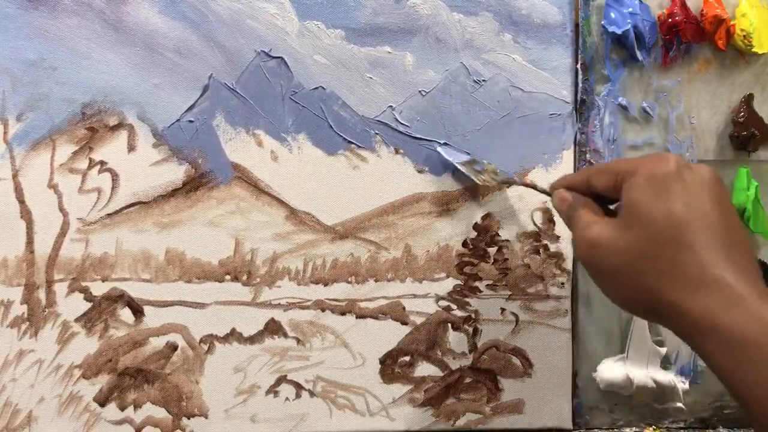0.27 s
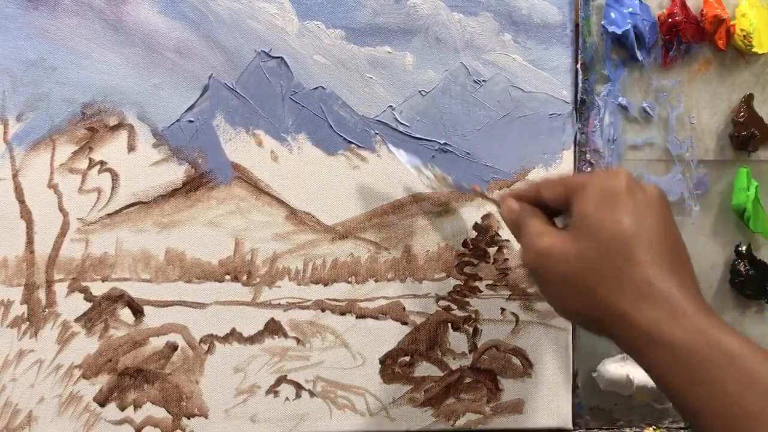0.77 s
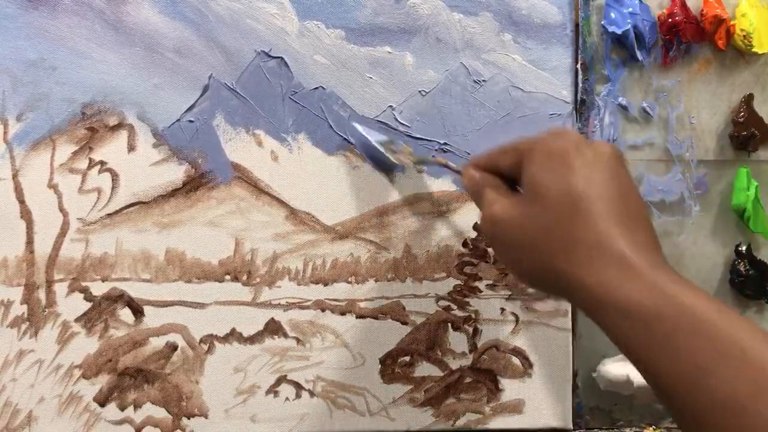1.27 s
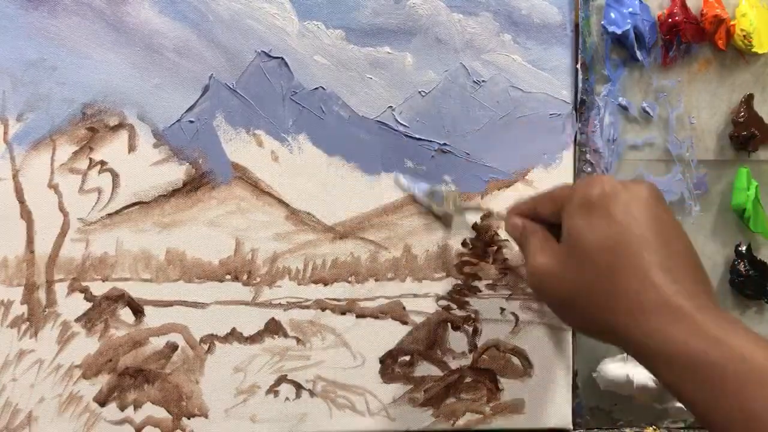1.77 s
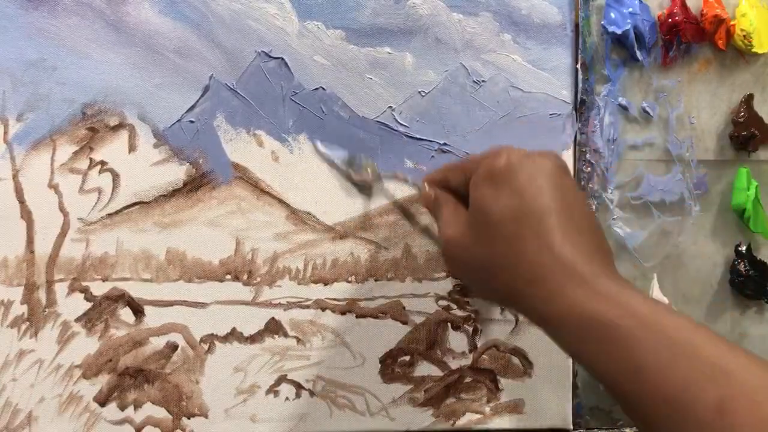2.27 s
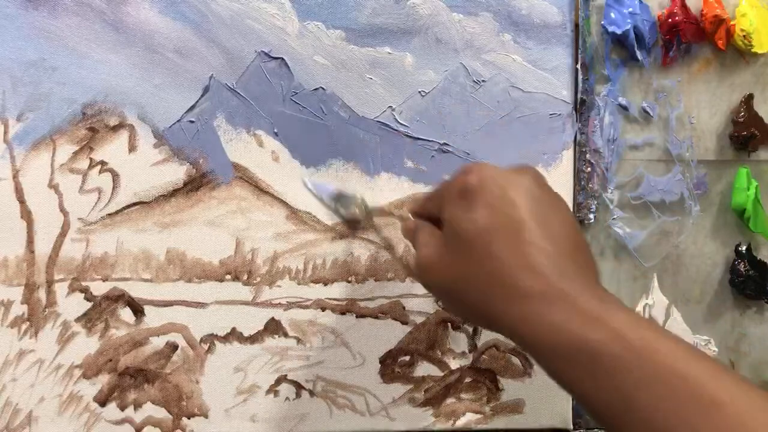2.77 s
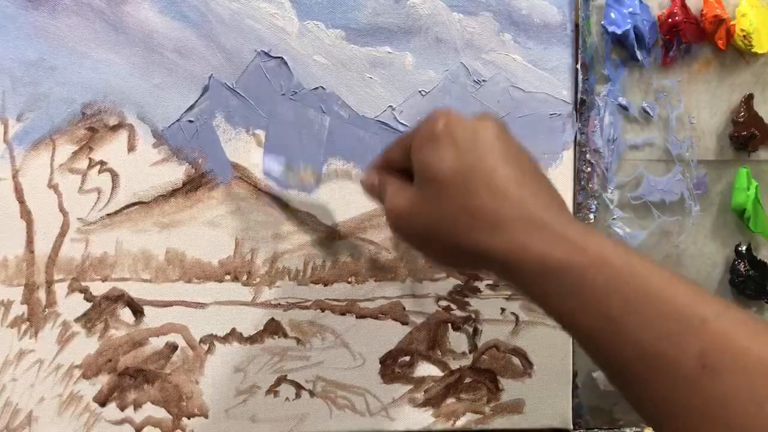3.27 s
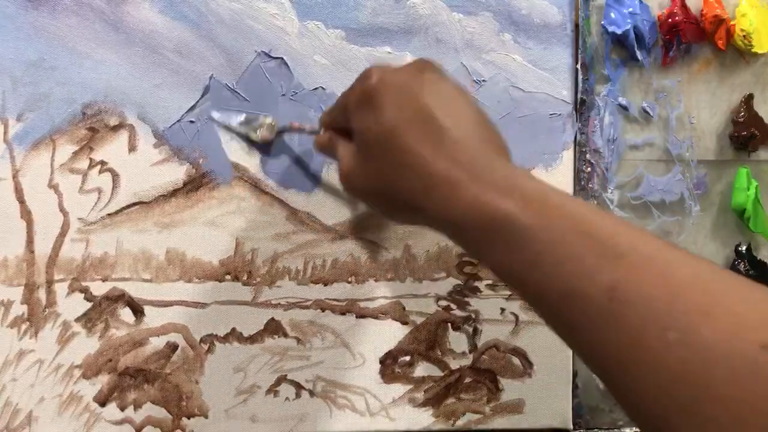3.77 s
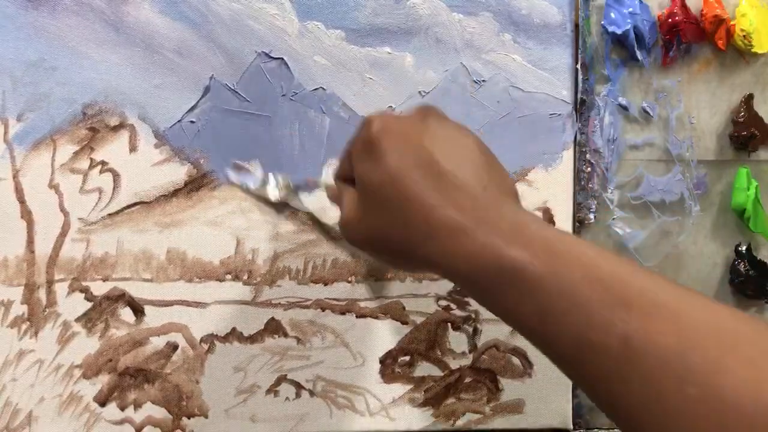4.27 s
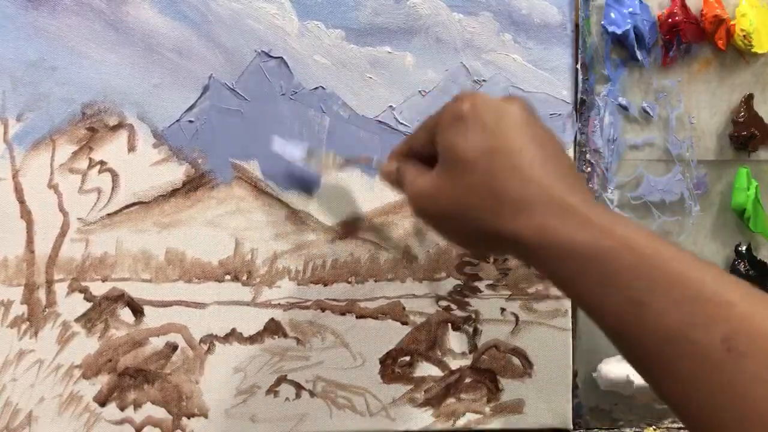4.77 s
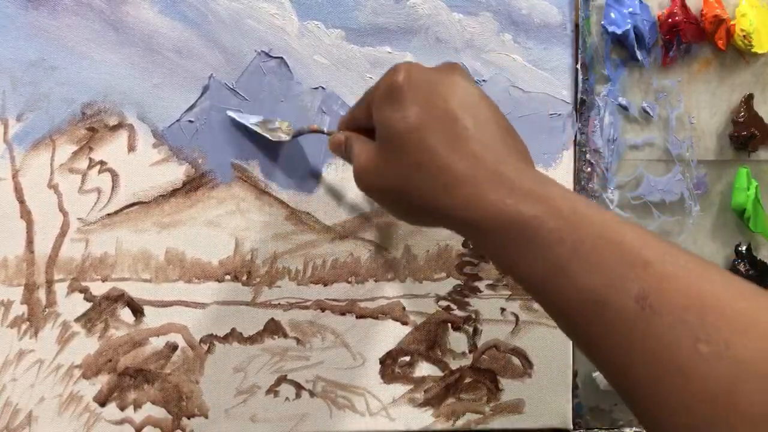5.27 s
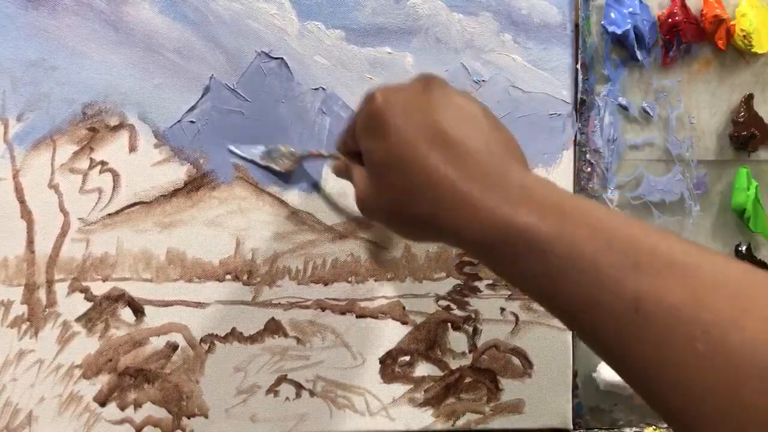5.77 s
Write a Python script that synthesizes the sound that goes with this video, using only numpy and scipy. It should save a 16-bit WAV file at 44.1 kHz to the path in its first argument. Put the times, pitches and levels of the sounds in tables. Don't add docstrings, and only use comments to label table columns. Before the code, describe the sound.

Close, quick palette-knife scrapes rasp across taut canvas, with hollow papery resonance, faint steel hiss, landing taps and low easel thuds in a quiet room.

```python
import sys
import numpy as np
from scipy import signal
from scipy.fft import rfft, irfft
from scipy.io import wavfile
from scipy.ndimage import uniform_filter1d

SR = 44100
rng = np.random.default_rng(int(sys.argv[2]) if len(sys.argv) > 2 else 0)


def to_wav(s):
    ch = np.atleast_2d(s).T
    pcm = np.round(np.clip(ch, -1, 1) * 32767)
    wavfile.write(sys.argv[1], SR, pcm.astype(np.int16))


def how_loud(loudness_db):
    steps = np.asarray(loudness_db, float) / 20
    return 10 ** steps


N = 265173
TIME = np.arange(N) / SR

# start_s (blade lands), build_ms (speeding up), hold_ms (full speed), bite_db, hiss_db
STROKES = [(0.070, 91, 15, -78, -90), (0.335, 42, 7, -79, -97), (0.417, 18, 23, -49, -62.5),
           (0.624, 74.6, 3.7, -48.5, -62.5), (0.960, 170, 19, -56.5, -71), (1.459, 89, 25, -44, -57.5),
           (1.745, 100, 5.5, -47, -62.5), (1.982, 28.5, 10.2, -46, -53), (2.266, 81, 18, -45, -55.5),
           (2.619, 175, 11, -48.5, -64.5), (3.095, 57, 48, -40.5, -54.5), (3.423, 113, 28, -39.5, -61),
           (3.798, 111, 8.6, -44.5, -72), (4.096, 29, 17, -64.5, -91), (4.154, 87, 22, -44, -62.5),
           (4.539, 110, 57, -43, -60.5), (4.919, 17, 10, -67, -82), (5.015, 38, 76, -44.5, -61.5),
           (5.319, 113.5, 19, -46, -72), (5.450, 72, 14, -56.5, -88), (5.583, 6.9, 3.7, -53, -70),
           (5.615, 20, 6, -77, -78), (5.773, 129, 15, -48, -65.5)]
# slack_push_db and taut_push_db (above bite), sheen_db (above hiss),
# landing_ms, abruptness_percent
CONTACT = [(13.5, 5, -6, 35, 190), (23, -1, -3, 37, 220), (-5.5, -7, -11, 10.7, 132),
           (0, -6, -14, 7.7, 150), (3.5, 1, -11, 9.6, 110), (-2, -1, -12, 16, 100),
           (-2.5, -0.5, -13, 14, 139), (-8.5, -2.5, -13.5, 19.6, 117), (-4.5, 2, -25, 25, 90),
           (-6, -2, -7, 21, 140), (-7.5, 0, -29, 8.3, 97), (-4.5, -4, -7.5, 68, 103),
           (-7, -5, -0.5, 11, 130), (2.5, -0.5, -8, 11, 64), (-5.5, -6, -6, 22, 92),
           (-6.5, -1.5, -10, 12, 103), (7.5, 4, -10, 12, 80), (-7, -1.5, -15, 12.3, 86),
           (-2, 2, -3, 13, 114), (10.5, 13.5, -13.5, 17, 180), (5.5, 12.5, -11, 6.2, 112),
           (-2, 14, -14, 14, 140), (-1.5, 4, -9.5, 15, 61)]
BITE_SWELL = dict(rise_db_s=163, fall_db_s=152, hold_share=0.57, rest_db=-78.5)
SLACK_SWELL = dict(rise_db_s=24, fall_db_s=145, hold_share=1.7, rest_db=-76)
TAUT_SWELL = dict(rise_db_s=114, fall_db_s=151, hold_share=0.89, rest_db=-81.5)
HISS_SWELL = dict(rise_db_s=240, fall_db_s=129, hold_share=0.57, rest_db=-79)
SHEEN_SWELL = dict(rise_db_s=156, fall_db_s=155, hold_share=1, rest_db=-87)
# pitch_hz, width_hz, level_db
DRUM_MODES = [
    (240.8, 32.3, -6.5),
    (288.3, 44.3, -1),
    (359.3, 36.4, 0.5),
    (425.8, 23.1, -2.5),
    (457.3, 17, 2.5),
    (517.3, 31, -4),
    (581.5, 23.2, -6),
]
# pitch_hz, width_hz, level_db
FRAME_MODES = [(652, 62, -2.5), (827.5, 89, -3.5), (967, 104, -3.5), (1073, 112, -3.5), (1178, 107, -4.5),
               (1368, 43, -7.5), (1467, 123, -11), (1950, 290, -14.5), (2116, 272, -14.5)]
# pitch_hz, width_hz, level_db
FLEX_MODES = [(950, 26.3, 11)]
# pitch_hz, level_db (per Hz)
BLADE_COLOUR = [(1060, -23), (1800, -9), (2020, -6), (2800, -8.5), (3040, -6), (4640, -10), (5030, -12.5),
                (6140, -9.5), (7480, -15), (9040, -14.5), (10400, -22.5), (14300, -22), (15500, -24)]
# pitch_hz, width_hz, level_db
EDGE_MODES = [(8570, 860, 0.5), (9560, 220, 1), (11430, 830, -5), (12800, 750, -11)]
# start_s, level_db (peak), brightness_db (steel tick above the blow)
TAPS = [(0.076, -61, -21), (0.43, -36, -29), (0.636, -45, -15), (0.968, -37, -10.5), (0.998, -39.5, -32),
        (1.465, -38, -32), (1.754, -36.5, -14.5), (1.988, -32, -15), (2.235, -35, -13), (2.622, -42, -32),
        (3.026, -43.5, -15), (3.067, -43, -19), (3.11, -29, -29), (4.551, -42, -31), (4.734, -45, -25),
        (4.933, -40.5, -16), (5.019, -35, -17.5), (5.194, -29, -37), (5.591, -25, -42), (5.603, -26.5, -34),
        (5.634, -58, -33), (5.738, -50, -24)]
# start_s, build_ms, hold_ms, level_db
SHUDDERS = [(0.130, 51, 30, -63), (0.380, 50, 53, -65.5), (0.630, 21, 50, -57.5), (0.970, 38, 30, -60.5),
            (1.750, 30, 30, -56.5), (1.850, 34, 34, -73), (2.040, 35, 37, -69), (2.560, 25, 46.5, -63),
            (2.700, 100, 48, -56.5), (2.900, 30, 7, -68), (4.352, 165, 73, -51), (4.660, 157, 68, -51.5),
            (4.900, 73, 40, -61), (5.060, 51, 150, -57.5)]
SHUDDER_SWELL = dict(rise_db_s=127, fall_db_s=150, hold_share=0.45, rest_db=-72.5)
# start_s, level_db (peak), pitch_hz
THUDS = [(1.77, -47, 79), (2.57, -45, 75), (2.925, -50.5, 90), (2.941, -47, 90.7), (4.384, -44, 93.2),
         (4.437, -38.5, 109), (4.51, -48, 94), (4.728, -40.5, 89), (4.824, -40, 109), (5.125, -46, 65),
         (5.192, -44.5, 100), (5.280, -48, 65)]
# start_s, pitch_hz (centre), level_db
WHINE = [
    (3.6, 2010, -100),
    (3.8, 1950, -105),
    (4.1, 1900, -68.5),
    (4.4, 1893, -85),
    (4.75, 1950, -69.5),
    (4.9, 1854, -67),
    (5.1, 1765, -65),
    (5.3, 1750, -100),
]
# start_s, pitch_hz, level_db
SQUEAL = [
    (3.44, 12800, -100),
    (3.465, 12650, -77),
    (3.49, 12400, -78),
    (3.52, 12960, -80),
    (3.55, 11700, -100),
]
# pitch_hz, level_db (per Hz)
ROOM_COLOUR = [(18, -44), (30, -8.5), (75, -4), (192, -8.5), (341, -5), (748, -12.5), (972, -13),
               (1600, -16.5), (4910, -30.5), (8970, -39.5), (10500, -38), (12300, -33), (15500, -35)]


def strokes():
    bite_db = stroke_db(np.array(STROKES)[:, 3], BITE_SWELL)
    coarse = catches(rate=2500, spread_db=3.5, patchy_db=0.84)
    fine = catches(rate=16000, spread_db=0.0, patchy_db=1.04)

    shove = signal.lfilter(*signal.butter(2, 1100, fs=SR), coarse)
    slack = driven(shove, push_db(0, SLACK_SWELL), DRUM_MODES[:3], wander_db=2.5)
    taut = driven(shove, push_db(1, TAUT_SWELL), DRUM_MODES[3:], wander_db=1.5)

    grit = signal.lfilter(*signal.butter(2, 3200, fs=SR), 0.54 * coarse + 0.86 * fine)
    flex_db = bite_db + 0.2 * (bite_db + 47.5)
    flex = driven(grit, flex_db, FLEX_MODES, wander_db=0.4)
    frame = driven(grit, bite_db, FRAME_MODES, wander_db=1.43)
    return how_loud(-0.82) * (slack - taut) + how_loud(-2.94) * frame + how_loud(-6.5) * flex


def blade():
    peak_db = np.array(STROKES)[:, 4]
    hiss_db = stroke_db(peak_db, HISS_SWELL)
    sheen_db = stroke_db(peak_db + np.array(CONTACT)[:, 2], SHEEN_SWELL)

    hiss = colour(catches(rate=16000, spread_db=0.0, patchy_db=1.02), BLADE_COLOUR)
    centres_hz = 1900 * 2 ** np.arange(0, 3.1, 1 / 2)
    clumps = sum(ring(hiss, [(hz, hz / 2.5, 0)]) * how_loud(1.46 * walk(30)) for hz in centres_hz)
    sheen = sum(ring(rng.standard_normal(N), [mode]) * how_loud(3 * walk(10)) for mode in EDGE_MODES)
    return how_loud(hiss_db) * level(clumps, -0.83) + how_loud(sheen_db) * level(sheen, -1.5)


def taps():
    blow, tick = np.zeros(N), np.zeros(N)
    length = 800
    t = TIME[:length]
    for s, db, bright_db in TAPS:
        i = int(s * SR)
        grain = rng.standard_normal(length)
        blow[i:i + length] += how_loud(db) * pulse(t, 0.00055, 0.00031)
        tick[i:i + length] += how_loud(db + bright_db) * grain * pulse(t, 0.0016, 0.0013)
    drum = how_loud(8.0) * ring(blow, DRUM_MODES)
    frame = how_loud(4.5) * ring(blow, FRAME_MODES + FLEX_MODES)
    steel = how_loud(-6.0) * ring(tick, [(1350, 750, 5.8), (4340, 2400, 1.6)])
    return drum + frame + steel


def easel():
    count = len(SHUDDERS)
    own_db = swell(SHUDDERS, np.array(SHUDDERS)[:, 3], [7.7] * count, np.ones(count), **SHUDDER_SWELL)
    coupled_db = push_db(0, SLACK_SWELL) - 24.5
    shake = np.hypot(how_loud(own_db), how_loud(coupled_db))

    low = signal.butter(2, (55, 190), "bandpass", fs=SR, output="sos")
    rumble = signal.sosfilt(low, catches(rate=300, spread_db=-2.0, patchy_db=-1.0))
    out = level(rumble, -2.1) * shake

    length = 4000
    t = TIME[:length]
    for s, db, hz in THUDS:
        i = int(s * SR)
        out[i:i + length] += how_loud(db) * pulse(t, 0.0051, 0.0045) * np.sin(2 * np.pi * hz * t)
    return out


def faint_tones():
    hz, db = columns(WHINE)
    wobble = level(signal.lfilter([1], [1, -.985], rng.standard_normal(N)), 0)
    whine = how_loud(db) * wobble * glide(hz)
    hz, db = columns(SQUEAL)
    squeal = how_loud(db + 2.1 * walk(90)) * glide(hz)
    return whine + squeal


def echo(x, t60, wet_db):
    t = TIME[:SR // 2]
    noise = signal.lfilter([1], [1, -.6], rng.standard_normal(len(t)))
    tail = noise * 10 ** (-3 * t / t60) * (t > .004)
    return how_loud(wet_db) * signal.fftconvolve(x, tail / np.sqrt(np.sum(tail ** 2)))[:N]


def room_hum():
    return level(colour(rng.standard_normal(N), ROOM_COLOUR), -70) * how_loud(1.2 * walk(6.7))


def catches(rate, spread_db, patchy_db):
    happens = rng.random(N) < rate / SR
    size = np.minimum(rng.exponential(size=N), 3)
    sign = rng.standard_normal(N)
    return level(happens * how_loud(spread_db * size) * sign * how_loud(patchy_db * walk(45)), 0)


def driven(force, db, modes, wander_db):
    moved = sum((-1) ** k * ring(force * how_loud(db + wander_db * walk(9)), [mode])
                for k, mode in enumerate(modes))
    return moved / np.std(ring(force, modes))


def ring(x, modes):
    return sum((-1) ** k * how_loud(db) * signal.lfilter(*signal.iirpeak(hz, hz / width, SR), x)
               for k, (hz, width, db) in enumerate(modes))


def push_db(column, law):
    return stroke_db(np.array(STROKES)[:, 3] + np.array(CONTACT)[:, column], law)


def stroke_db(peak_db, law):
    *_, landing_ms, abrupt_percent = np.transpose(CONTACT)
    return swell(STROKES, peak_db, landing_ms, abrupt_percent / 100, **law)


def swell(events, peak_db, landing_ms, abrupt, rise_db_s, fall_db_s, hold_share, rest_db):
    round_db = 0.5
    power = np.full(N, how_loud(2 * rest_db))
    for (s, build_ms, hold_ms, *_), db, land, pace in zip(events, peak_db, landing_ms, abrupt):
        i = int(s * SR)
        ms = 1000 * TIME[:min(SR, N - i)]
        rise = rise_db_s * np.maximum(build_ms - ms, 0)
        fall = fall_db_s * np.maximum(ms - build_ms - hold_share * hold_ms, 0)
        drop = pace * (rise + fall) / 1000
        top_db = db - round_db - np.hypot(drop, round_db)
        power[i:i + SR] += np.minimum(ms / land, 1) ** 4 * how_loud(2 * top_db)
    return 10 * np.log10(power)


def pulse(t, rise_s, decay_s):
    return t / rise_s * np.exp(1 - t / decay_s)


def glide(hz):
    return np.sin(2 * np.pi * np.cumsum(hz) / SR)


def walk(rate):
    k = int(SR / rate)
    held = np.repeat(rng.standard_normal(N // k + 1), k)
    return 1.65 * uniform_filter1d(uniform_filter1d(held, k), k)[:N]


def colour(x, points):
    hz, db = np.transpose(points)
    bins = np.maximum(np.fft.rfftfreq(N, 1 / SR), 1)
    return irfft(rfft(x) * how_loud(np.interp(np.log(bins), np.log(hz), db)), N)


def columns(table):
    s, *rest = np.transpose(table)
    return [np.interp(TIME, s, c) for c in rest]


def level(x, db):
    return x * how_loud(db) / np.sqrt(np.mean(x ** 2))


def scene():
    knife = strokes() + blade() + taps()
    hum = room_hum()
    mix = knife + echo(knife, t60=0.15, wet_db=-15) + easel() + faint_tones() + hum
    return mix[None]


def top_cut(x):
    return signal.sosfilt(signal.butter(12, 15680, fs=SR, output="sos"), x)


def record(dry):
    trimmed = signal.sosfilt(signal.ellip(8, .2, 60, 15650, fs=SR, output="sos"), dry)
    mix = signal.sosfilt(signal.butter(4, 48, "highpass", fs=SR, output="sos"), trimmed)
    return top_cut(mix)


dry = scene()
out = record(dry)
to_wav(out)
```